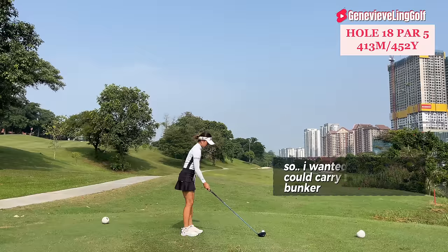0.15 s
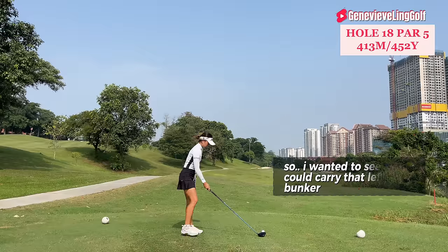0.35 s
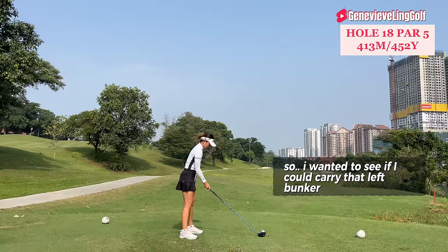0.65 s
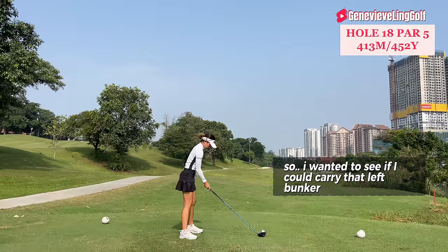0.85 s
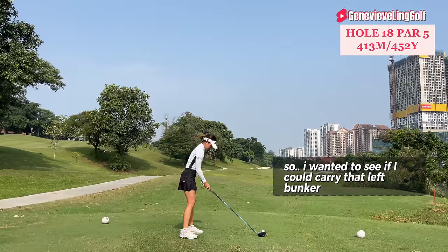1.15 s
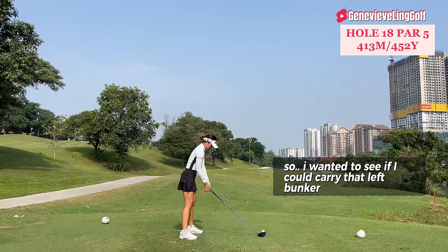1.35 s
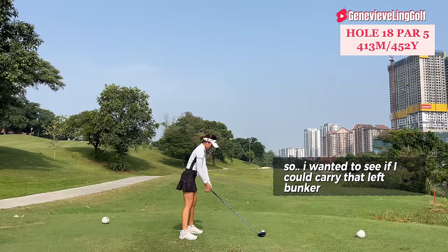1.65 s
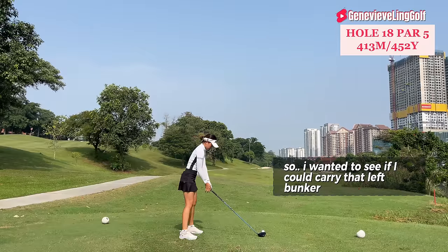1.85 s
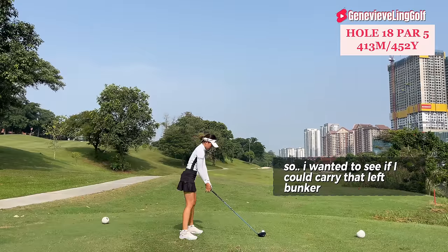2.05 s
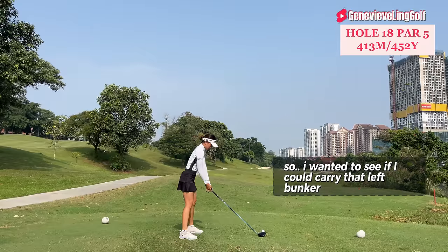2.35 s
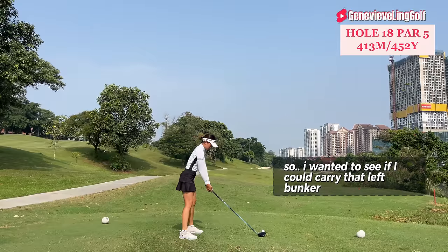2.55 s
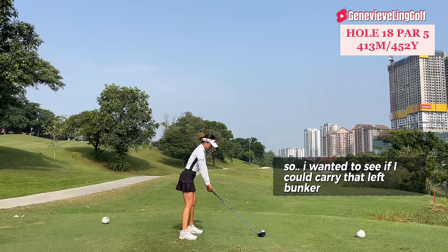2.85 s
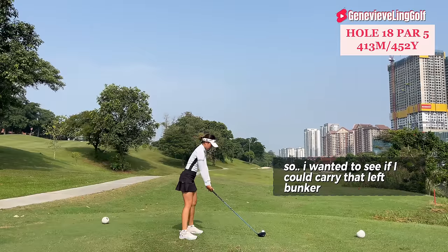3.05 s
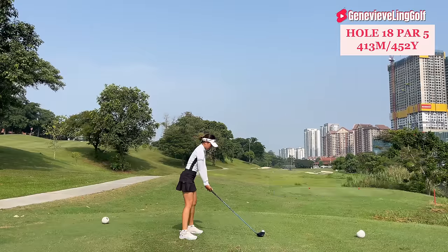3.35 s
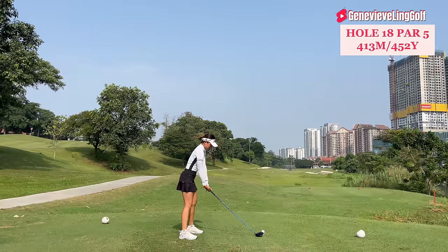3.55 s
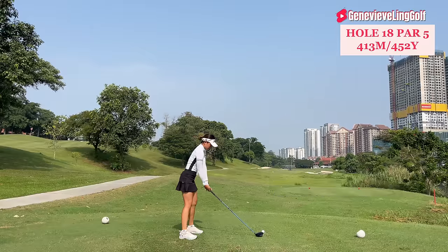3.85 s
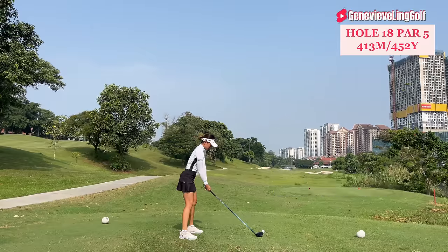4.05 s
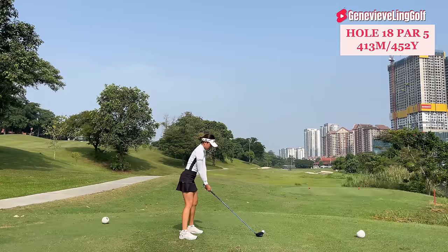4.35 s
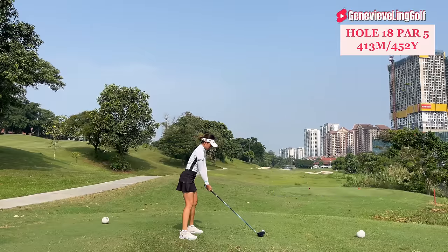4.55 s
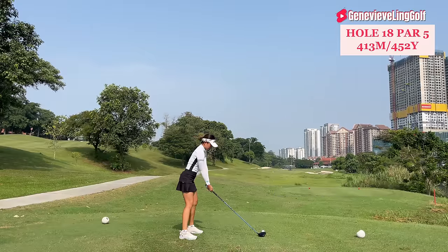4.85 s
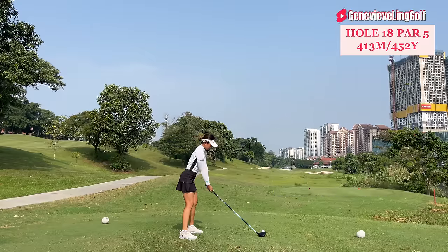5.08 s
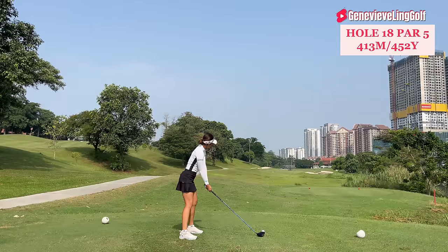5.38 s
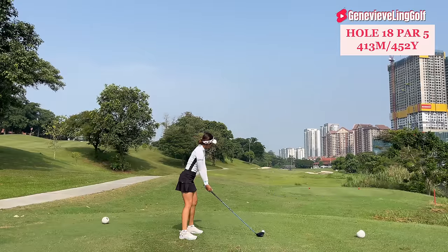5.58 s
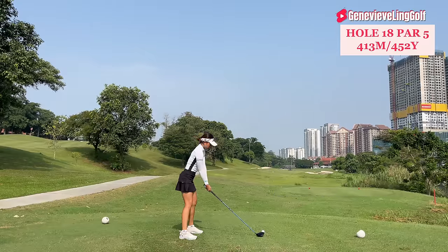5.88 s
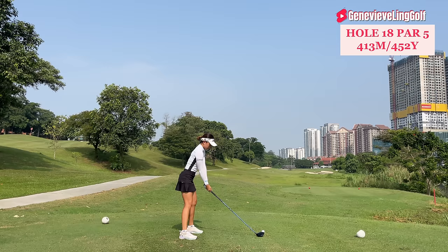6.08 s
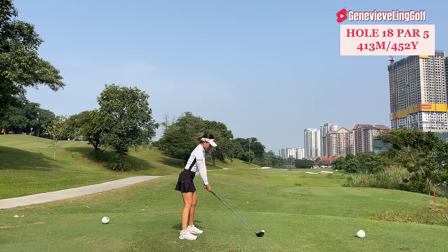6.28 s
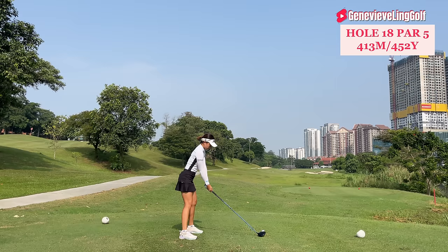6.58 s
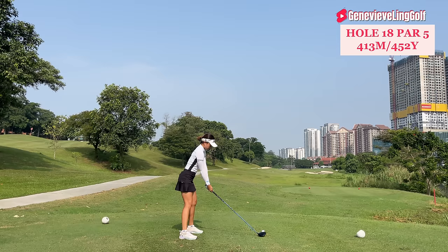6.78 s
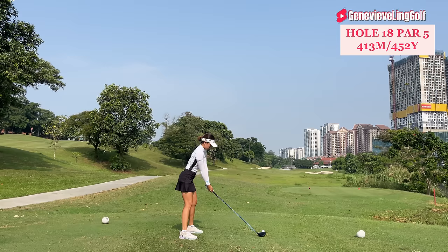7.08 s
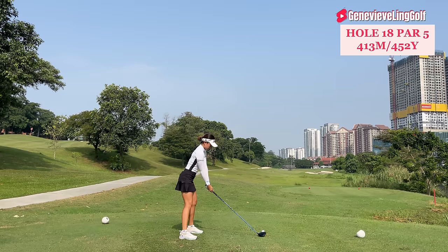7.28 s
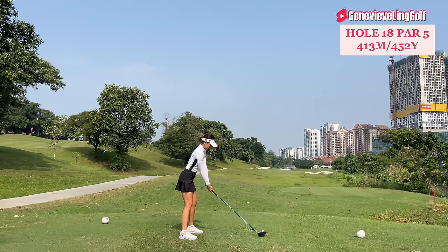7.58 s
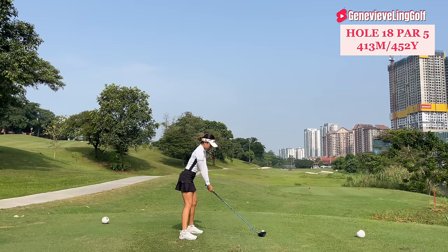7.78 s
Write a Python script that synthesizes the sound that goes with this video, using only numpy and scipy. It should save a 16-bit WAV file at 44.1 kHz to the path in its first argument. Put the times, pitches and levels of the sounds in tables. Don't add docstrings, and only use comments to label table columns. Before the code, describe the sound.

Steady low city rumble with a wavering engine drone, scattered birdsong, one piercing close whistle, and distant steel knocks clattering at the end.

```python
import sys
import numpy as np
from scipy import signal
from scipy.fft import rfft, irfft
from scipy.io import wavfile
from scipy.ndimage import uniform_filter1d

SR = 44100
rng = np.random.default_rng(int(sys.argv[2]) if len(sys.argv) > 2 else 0)


def decibels_to_gain(level_db):
    exponent = np.asarray(level_db, float) / 20
    return 10 ** exponent


def output_pcm(signal):
    pcm = np.clip(np.atleast_2d(signal).T, -1, 1) * 32767
    wavfile.write(sys.argv[1], SR, np.round(pcm).astype(np.int16))


N = 349272
TIME = np.arange(N) / SR

# (time [s], pitch [Hz], level [dB], left over right [dB])
SHRILL = [
    (2.338, 8260, -52, 3.0),
    (2.385, 8470, -41, -2),
    (2.42, 8395, -35, -3),
    (2.455, 8330, -28, 3),
    (2.505, 8270, -23, -1),
    (2.575, 8255, -23, 0),
    (2.603, 8265, -34, 4),
    (2.65, 8252, -32, 4),
    (2.725, 8240, -52, 5),
]
# (time [s], pitch [Hz], level [dB])
ARCS = [
    [(3.92, 4520, -54), (3.955, 4760, -51), (4.05, 4830, -52), (4.13, 4720, -48), (4.17, 4580, -54),
     (4.23, 4340, -63), (4.29, 4210, -51), (4.31, 4180, -58)],
    [(3.95, 3800, -56), (4.02, 3960, -54), (4.08, 3940, -58), (4.15, 3860, -52), (4.18, 3670, -57),
     (4.225, 3500, -54), (4.25, 3450, -58)],
    [(4.375, 4020, -60), (4.395, 4120, -57), (4.43, 4180, -62), (4.448, 4215, -45), (4.465, 4225, -60)],
    [(4.482, 4230, -56), (4.5, 4225, -44), (4.53, 4170, -52), (4.572, 4095, -45), (4.588, 4050, -51),
     (4.62, 4035, -42), (4.67, 3990, -43), (4.705, 3830, -53)],
    [(4.38, 3190, -58), (4.43, 3270, -57), (4.52, 3360, -57), (4.56, 3390, -63), (4.64, 3370, -59),
     (4.72, 3300, -61)],
    [(6.24, 4700, -60), (6.29, 4840, -53), (6.325, 4950, -49), (6.345, 4910, -47), (6.368, 4870, -40),
     (6.38, 4820, -43), (6.392, 4450, -50)],
]
# (time [s], length [s], from [Hz], to [Hz], level [dB])
SWELLING_NOTES = [
    (5.335, .148, 4950, 5150, -48),
    (5.755, 0.122, 5085, 5060, -44),
]
# (time [s], length [s], from [Hz], to [Hz], level [dB])
CHIPS = [
    (.235, 0.018, 7500, 5950, -54),
    (.25, 0.052, 6140, 5930, -52),
    (.35, 0.033, 7140, 6340, -55),
    (.355, 0.037, 5880, 6180, -45.5),
    (2.83, 0.043, 6830, 6180, -52),
    (3.475, 0.035, 7420, 5220, -44),
    (3.49, 0.06, 6560, 5920, -56),
    (3.625, 0.033, 7200, 5400, -45),
]
# (time [s], length [s], from [Hz], to [Hz], level [dB])
HELD_NOTES = [
    (.245, 0.025, 6400, 6200, -46),
    (3.481, 0.015, 6770, 6700, -35.5),
    (3.56, 0.044, 5870, 5902, -54),
    (3.635, 0.074, 6300, 6230, -51),
]
# (time [s], length [s], from [Hz], to [Hz], level [dB])
PIPS = [(.505, 0.015, 3400, 3170, -50), (.542, 0.023, 3450, 3460, -44), (.57, 0.09, 3480, 3430, -51),
        (.752, .035, 1970, 1954, -50), (6.255, .035, 3060, 3100, -44), (3.67, 0.074, 3390, 3640, -51),
        (1.46, 0.074, 4720, 4530, -54), (2.94, 0.027, 1850, 1790, -45), (3.76, 0.026, 4560, 4530, -51),
        (4.74, 0.057, 3350, 3367, -44.5), (6.68, 0.06, 2662, 2486, -47.5), (6.89, 0.047, 2633, 2292, -45.5),
        (7.05, 0.062, 2610, 2460, -46), (7.1, 0.062, 2475, 2228, -45), (7.275, 0.034, 2494, 2177, -44.5)]
# (time [s], length [s], from [Hz], to [Hz], level [dB])
BURRS = [(.57, 0.066, 3090, 3030, -44), (.685, 0.025, 2253, 2600, -49), (.722, .025, 2730, 2200, -47),
         (1.17, 0.063, 3490, 4140, -47.5), (1.47, 0.059, 3076, 3420, -44.5),
         (1.96, 0.066, 1745, 1613, -45.5), (4.02, 0.03, 3320, 3107, -45.5),
         (4.062, 0.032, 3200, 3040, -43.5), (4.725, 0.053, 3020, 3250, -43.5),
         (4.89, 0.05, 3230, 3490, -45), (4.97, 0.035, 3280, 2950, -47), (5.07, 0.039, 3300, 3050, -49),
         (6.23, 0.042, 2500, 2800, -48), (6.41, 0.043, 3750, 3550, -53)]
# (time [s], length [s], from [Hz], to [Hz], level [dB])
SCOLDS = [(.13, 0.033, 5200, 4230, -57), (.48, 0.088, 5240, 4070, -57), (1.09, 0.1, 5620, 4250, -54),
          (1.38, 0.083, 5100, 3760, -55), (2.27, 0.027, 5050, 4210, -52), (2.92, 0.031, 4636, 2235, -58),
          (3.58, 0.022, 3530, 1515, -51.5), (5.46, 0.077, 3643, 2000, -57), (5.59, .05, 5860, 5260, -59),
          (5.895, 0.03, 4300, 3802, -55), (6.4, 0.031, 4420, 3680, -50), (2.12, 0.039, 5170, 4400, -57),
          (2.62, 0.051, 5190, 4510, -62)]
# (time [s], level [dB])
TWITTER_RUNS = [
    (6.7, -58),
    (6.9, -55),
    (7.096, -57),
    (7.309, -54),
]
# (time [s], blow level [dB], brightest pitch [Hz], ring share [0-1])
KNOCKS = [(1.78, -24.5, 1500, 0.6), (5.19, -21.5, 412, 0.79), (5.5, -48, 5970, .05),
          (5.572, -48, 9050, 0.1), (7.061, -28, 600, 0.6), (7.44, -15, 959, 0.71), (7.454, -22, 640, 0.63),
          (7.462, -17, 644.6, 0.7), (7.478, -25, 2254, 0.93), (7.481, -21.5, 400, 0.7),
          (7.482, -25, 1200, 0.73), (7.503, -21, 1500, 0.8), (7.516, -25, 1250, 0.5),
          (7.532, -33, 1886, 0.69), (7.552, -25, 601, 0.74), (7.575, -35, 1700, 0.7),
          (7.597, -24.5, 599.4, 0.43), (7.62, -28, 1100, 0.65), (7.7, -26, 1300, 0.83),
          (7.703, -16.5, 2500, 0.94), (7.718, -29, 1250, 0.87), (7.733, -31, 2260, 0.8)]
# (pitch [Hz], level [dB], 60 dB decay time [s])
FRAME_MODES = [(428.5, 5, 0.096), (558, 0, 0.088), (609, 0.5, 0.11), (675, 1, 0.092), (1099, 3, 0.041),
               (1195, 6.5, 0.053), (1250, 3, 0.056), (1547, -3, 0.063), (1685, -7, 0.06), (1850, -9, 0.051),
               (2025, -19, 0.024), (2264, 0, 0.052), (2950, -20, 0.055)]
# (time [s], length [s], from [Hz], to [Hz], level [dB])
HUM = (1.645, .17, 550, 545, -37)
# (time [s], pitch [Hz])
ENGINE = [(0, 66.1), (.26, 74.8), (.73, 69.6), (1.39, 65.9), (1.85, 53.3), (2.27, 62.86), (2.42, 54.3),
          (2.58, 63.3), (2.87, 55.2), (3.17, 61), (3.5, 53.4), (3.95, 63.4), (4.3, 67.35), (4.5, 54.2),
          (4.8, 62.5), (5.4, 53.34), (5.8, 64.86), (6.04, 53.3)]
# (middle [s], length [s], level [dB])
SURGES = [(0, 0.044, -11), (0.283, 0.37, -19), (0.711, 0.078, -10.5), (0.924, .16, -32),
          (1.382, 0.07, -9.5), (1.535, 0.048, -14), (1.81, 0.12, -13), (2.095, 0.22, -16.5),
          (2.31, 0.15, -11), (2.58, 0.25, -16.5), (2.87, .1, -20), (3.05, 0.079, -19),
          (3.168, 0.099, -16.5), (3.41, .1, -14), (3.782, 0.31, -15), (3.951, 0.067, -13),
          (4.132, 0.25, -18), (4.375, 0.15, -15), (4.614, 0.21, -16), (5.042, 0.28, -18),
          (5.357, 0.14, -15), (5.501, 0.12, -13), (5.65, 0.055, -16), (5.805, 0.1, -17), (6.061, 0.15, -18),
          (6.334, 0.62, -21.5), (6.651, 0.22, -16.5), (6.85, 0.085, -13), (7.05, 0.086, -11),
          (7.211, 0.16, -16.5)]
# (time [s], swell [dB])
TRAFFIC = [(0, 0.5), (.8, 0.9), (1.72, 1.5), (2.2, 1.5), (2.6, -0.5), (3.3, 0), (3.64, 0.5), (4.2, -1),
           (4.85, 0), (5.6, -0.7), (6.2, -0.1), (6.64, -1), (7.4, -0.2), (7.55, 1), (7.7, -0.9), (7.92, -1)]
# (pitch [Hz], left [dB per Hz], right [dB per Hz], likeness [0-1], right lead [rad])
CITY = [(24, -65, -62, 0.95, -7), (40.7, -43.5, -43.5, 0.99, 1), (48.7, -37, -39, 1, -0.5),
        (69.5, -39.5, -41, 1, -0.5), (153, -46, -48.5, 0.89, .5), (229.5, -50.5, -53, 0.96, 0.83),
        (456, -58, -60, 0.7, 2.06), (697, -58, -57, 0.76, 2.5), (1020, -63.5, -63, 0.52, 3),
        (2000, -74.5, -75, 0.36, 1), (2900, -78.5, -79, 0.3, 0.74), (5000, -79, -82.5, 0.43, 0.93),
        (6690, -80.5, -87, 0.4, 1.15), (7020, -90, -87.5, 0, 0.5), (10360, -86, -90.5, 1, 2)]
# (pitch [Hz], left [dB per Hz], right [dB per Hz], likeness [0-1], right lead [rad])
LEAF_HISS = [(10330, -100, -100, 0.88, 1.9), (10490, -86.5, -88, 0.96, 3.94),
             (10930, -83.5, -81.5, 0.87, 4.13), (11080, -88, -87, 0.7, 5), (11740, -91.5, -104, .85, 6.5),
             (11900, -98, -112, 0.854, 5.5)]


def in_time(rows):
    s, *columns = np.transpose(rows)
    return [np.interp(TIME, s, c) for c in columns]


def drift(rate, size):
    r = np.exp(-2 * np.pi * rate / SR)
    slow = signal.lfilter([1], [1, -2 * r, r * r], rng.standard_normal(size))
    return slow / np.std(slow)


def panned(x, pan_db):
    return np.array([x * decibels_to_gain(pan_db / 2), x * decibels_to_gain(-pan_db / 2)])


def whistle(rows, pan_db, lead, flutter_db, wobble_hz):
    out = np.zeros((2, N))
    span = slice(round(rows[0][0] * SR), round(rows[-1][0] * SR))
    s, hz, db = np.transpose(rows)[:3]
    t = TIME[span]
    pan_db = np.broadcast_to(pan_db, N)[span]
    ends = np.clip(np.minimum(t - s[0], s[-1] - t) / 0.0017, 0, 1)
    level_db = np.interp(t, s, db) + flutter_db * drift(40.0, size=SR)[-len(t):]
    strength = np.sqrt(2) * ends * decibels_to_gain(level_db)
    pitch = np.interp(t, s, hz) + wobble_hz * drift(61.0, size=SR)[-len(t):]
    phase = 2 * np.pi * np.cumsum(pitch) / SR
    left = decibels_to_gain(pan_db / 2) * np.sin(phase)
    right = decibels_to_gain(-pan_db / 2) * np.sin(phase + lead)
    out[:, span] = strength * np.array([left, right])
    return out


def note(s, length, from_hz, to_hz, db, swell_db=10, drop_hz=430):
    top, drop_s = 0.9, 0.012
    return [(s, from_hz, db - swell_db),
            (s + top * length, from_hz + top * (to_hz - from_hz), db),
            (s + length, to_hz, db),
            (s + length + drop_s, to_hz - drop_hz, db - 1.5)]


def calls(table, wobble_hz, sharpness, rasp):
    out = np.zeros(N)
    for s, length, from_hz, to_hz, db in table:
        start, along = round(s * SR), np.linspace(0, 1, round(length * SR))
        shake = drift(480.0, size=9000)[:len(along)]
        pulse = drift(260.0, size=9000)[:len(along)]
        hz = from_hz + (to_hz - from_hz) * along + wobble_hz * shake
        strength = np.sin(np.pi * along) ** sharpness * (1 + rasp * pulse)
        tone = np.sin(2 * np.pi * np.cumsum(hz) / SR)
        out[start:start + len(along)] += decibels_to_gain(db + 5.0) * strength * tone
    return out


def twitter():
    run_s, flicks_per_s, top_hz, bottom_hz = 0.1, 37, 5010, 3960
    out, since = np.zeros(N), TIME[:round(run_s * SR)]
    for s, db in TWITTER_RUNS:
        start = round(s * SR)
        uneven = 0.13 * drift(28.0, size=9000)[:len(since)]
        flick = np.minimum((since * flicks_per_s + uneven) % 1 / 0.58, 1)
        phase = 2 * np.pi * np.cumsum(top_hz + (bottom_hz - top_hz) * flick) / SR
        out[start:start + len(since)] += decibels_to_gain(db + 11.5) * np.sin(np.pi * flick) * np.sin(phase)
    return out


def chorus():
    count, low_hz, high_hz, fall, length_s = 45, 3800, 6700, 0.14, 0.06
    when, pitch, long, loud = rng.random((count, 4)).T
    from_hz = low_hz * (high_hz / low_hz) ** pitch
    level_db = -59 + 2 * (2 * loud - 1)
    start_s = when * (N / SR - 3 * length_s)
    return np.transpose([start_s, length_s * (0.5 + long), from_hz, from_hz * (1 - fall), level_db])


def knocks():
    spread_db, tilt_db = 1.5, 4
    out, spread = np.zeros(N + SR), rng.standard_normal((len(KNOCKS), len(FRAME_MODES)))
    since = TIME[:SR // 4]
    onset = 1 - np.exp(-since / 0.008)
    for (s, db, bright_hz, share), chance in zip(KNOCKS, spread):
        edges = [bright_hz / 1.8, min(bright_hz * 1.4, 11000)]
        band = signal.butter(2, edges, "band", fs=SR, output="sos")
        crack = signal.sosfilt(band, rng.standard_normal(len(since)))
        blow = (1 - share) * decibels_to_gain(11.5 - 60 * since / 0.25) * crack
        for (hz, mode_db, t60), c in zip(FRAME_MODES, chance):
            off_peak_db = tilt_db * np.log2(hz / bright_hz) ** 2
            gain = share * decibels_to_gain(mode_db - 0.5 + spread_db * c - off_peak_db)
            blow = blow + gain * decibels_to_gain(-60 * since / t60) * np.sin(2 * np.pi * hz * since)
        start = round(s * SR)
        out[start:start + len(since)] += decibels_to_gain(db) * onset * blow
    return out[:N]


def scatter(x, t60, wet_db):
    since = TIME[:SR // 2]
    tail = rng.standard_normal((2, len(since))) * decibels_to_gain(-60 * since / t60)
    tail /= np.sqrt(np.sum(tail ** 2, axis=1, keepdims=True))
    return x + decibels_to_gain(wet_db) * signal.fftconvolve(x, tail, axes=1)[:, :N]


def drone():
    lull_db, idle_db, idle_from_s = -27, -19, 7.38
    creep_hz = 1.25 * np.maximum(TIME - ENGINE[-1][0], 0)
    hz = in_time(ENGINE)[0] + creep_hz
    coarse = TIME[::50]
    strength = decibels_to_gain(lull_db) + decibels_to_gain(idle_db) * np.clip((coarse - idle_from_s) / 0.07, 0, 1)
    for s, length, db in SURGES:
        strength = strength + decibels_to_gain(db) * np.exp(-2.8 * ((coarse - s) / (length / 2)) ** 2 / 2)
    tone = np.sin(2 * np.pi * np.cumsum(hz) / SR + 0.54 * drift(10.0, size=N))
    return panned(np.sqrt(2) * decibels_to_gain(-4.5) * np.interp(TIME, coarse, strength) * tone, pan_db=1.0)


def field(table):
    hz = np.maximum(np.fft.rfftfreq(N, 1 / SR), 1)
    at, *columns = np.transpose(table)
    left_db, right_db, alike, lead = [np.interp(np.log(hz), np.log(at), c) for c in columns]
    alike = np.clip(alike, 0, 1)
    inside = (hz > at[0] / 2) & (hz < at[-1])
    shared, own = rfft(rng.standard_normal((2, N))) * np.sqrt(SR / 2) * inside
    right = alike * np.exp(1j * lead) * shared + np.sqrt(1 - alike ** 2) * own
    return irfft(np.array([shared * decibels_to_gain(left_db), right * decibels_to_gain(right_db)]), N)


def city():
    rumble = field(CITY)
    bass = signal.sosfiltfilt(signal.butter(2, 300, fs=SR, output="sos"), rumble)
    bright = signal.sosfiltfilt(signal.butter(2, 2000, "high", fs=SR, output="sos"), rumble)
    swell_db = in_time(TRAFFIC)[0]
    swell_db = swell_db - swell_db.mean()
    out = field(LEAF_HISS)
    for part, share in ((bass, 0.17), (rumble - bass - bright, 1), (bright, -0.43)):
        wander_db = 0.5 * drift(2.8, size=N)
        out = out + part * decibels_to_gain(share * swell_db + wander_db)
    return out


def masked(x):
    from_hz, depth_db = 7200, 21
    up_db, down_db, below_db = 44, 60, 11
    hz, _, cells = signal.stft(x, SR, nperseg=1024)
    power = uniform_filter1d(np.mean(abs(cells) ** 2, axis=0), size=3, axis=1)
    level = 10 * np.log10(power + 1e-20)
    high = np.where(hz[:, None] > from_hz, level, -200)
    peak = high.max(axis=0)
    octaves = np.log2(np.maximum(hz[:, None], 1) / hz[high.argmax(axis=0)])
    slope_db = np.where(octaves > 0, up_db * octaves, below_db - down_db * octaves)
    hidden = peak - depth_db - slope_db
    band = 10 * np.log10(uniform_filter1d(10 ** (level / 10), size=9, axis=0))
    ahead = np.roll(hidden, -1, axis=1)
    cells = cells * ((band > ahead) | (level > peak - depth_db))

    centre = cells.mean(axis=0)
    frames = cells.shape[-1]
    chance = np.repeat(rng.random((3, frames)), 3, axis=1)[:, :frames]
    low = 9700 + 300 * (chance[0] < 0.07)
    upper = 10420 + 170 * (chance[1] < 0.3)
    top = 11760 - 250 * (chance[2] < 0.35)
    gap_power = np.mean(abs(centre[(hz > 9700) & (hz < 10420)]) ** 2, axis=0)
    low = np.where(gap_power > np.median(gap_power) * decibels_to_gain(2 * 4.5), 9700 + 1.5 * 300, low)
    in_gap = (hz[:, None] > low) & (hz[:, None] < upper)
    cells = (cells - centre * in_gap) * (hz[:, None] < top)
    return signal.istft(cells, SR, nperseg=1024)[1][:, :N]


def scene():
    shrill = whistle(SHRILL, in_time(SHRILL)[2], lead=1.55, flutter_db=2.5, wobble_hz=13)
    glides = sum(whistle(rows, pan_db=9.0, lead=0.48, flutter_db=1.8, wobble_hz=22) for rows in ARCS)
    notes = sum(whistle(note(*row), pan_db=10.0, lead=0.36, flutter_db=2.5, wobble_hz=50)
                for row in SWELLING_NOTES)
    near = scatter(shrill, t60=0.55, wet_db=-11)
    near = near + scatter(glides, t60=0.25, wet_db=-4) + scatter(notes, t60=0.4, wet_db=2.5)

    sparrows = calls(CHIPS, wobble_hz=282, sharpness=0.31, rasp=0.26)
    sparrows += calls(HELD_NOTES, wobble_hz=90, sharpness=0.89, rasp=0.32)
    small = calls(BURRS, wobble_hz=190, sharpness=0.35, rasp=0.78)
    small += calls(SCOLDS, wobble_hz=357, sharpness=0.094, rasp=1.0)
    small += calls(chorus(), wobble_hz=251, sharpness=0.44, rasp=1.0) + twitter()
    chirps = panned(sparrows + small, pan_db=3.5)
    pips = panned(calls(PIPS, wobble_hz=30, sharpness=0.45, rasp=0.3), pan_db=1.0)
    far = scatter(chirps, t60=0.25, wet_db=1) + scatter(pips, t60=0.25, wet_db=-4)
    far = far + scatter(panned(knocks(), pan_db=-2), t60=0.4, wet_db=-5)

    hum_rows = note(*HUM, swell_db=-1, drop_hz=0)
    hum = whistle(hum_rows, pan_db=-1.0, lead=0.37, flutter_db=3.0, wobble_hz=3.9)
    return near + far + hum + drone() + city()


def top_cut(x):
    return signal.sosfilt(signal.butter(12, 11800, fs=SR, output="sos"), x)


def record(dry):
    low_cut = signal.sosfilt(signal.butter(3, 43.0, "high", fs=SR, output="sos"), dry)
    mix = masked(low_cut)
    return top_cut(mix)


dry = scene()
out = record(dry)
output_pcm(out)
```